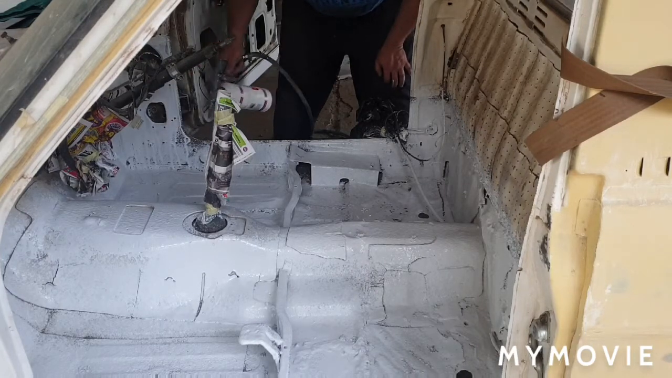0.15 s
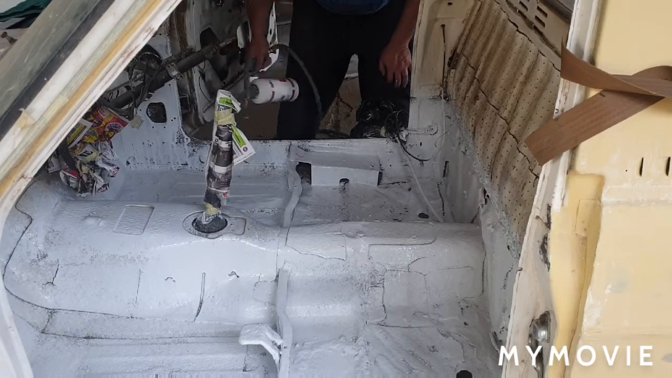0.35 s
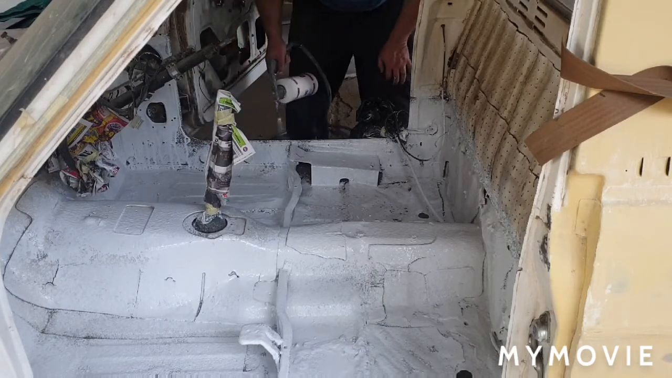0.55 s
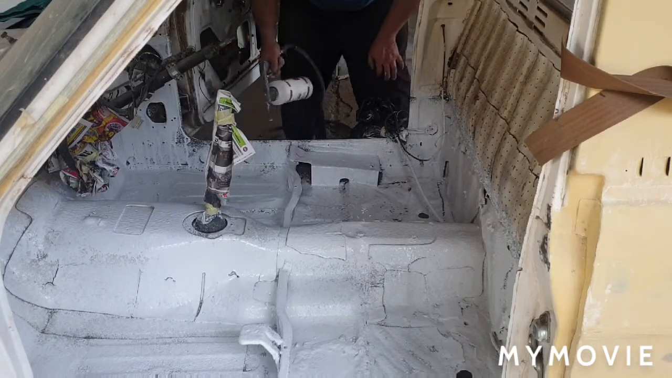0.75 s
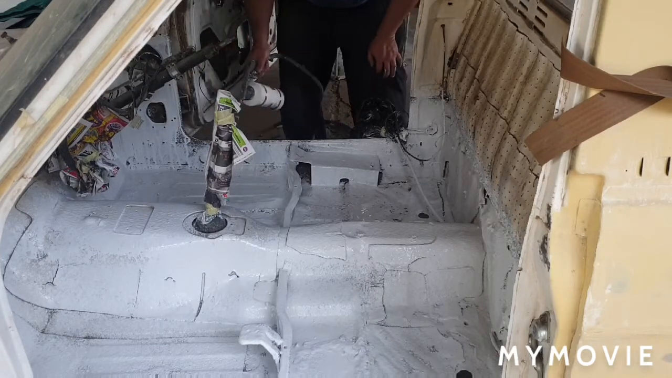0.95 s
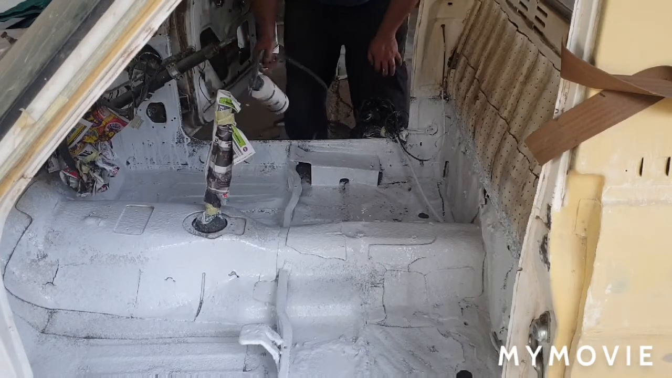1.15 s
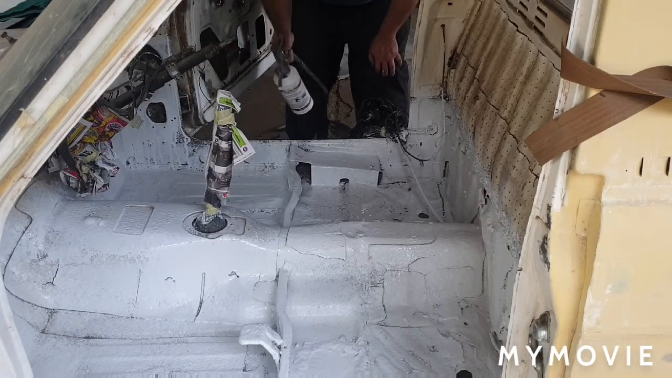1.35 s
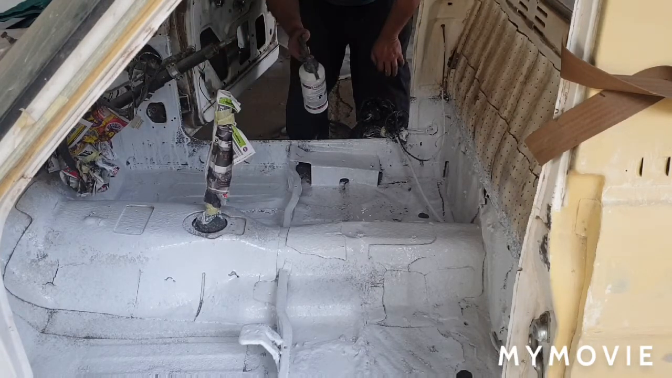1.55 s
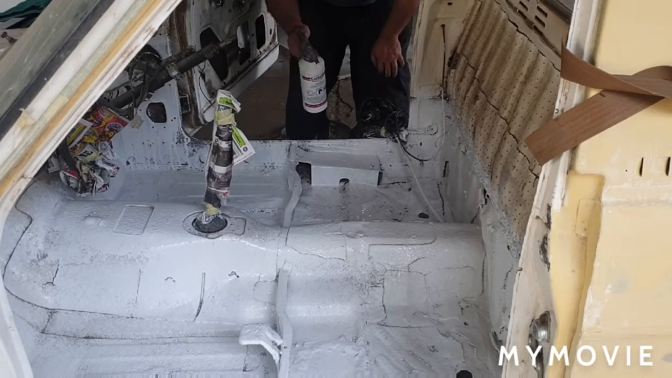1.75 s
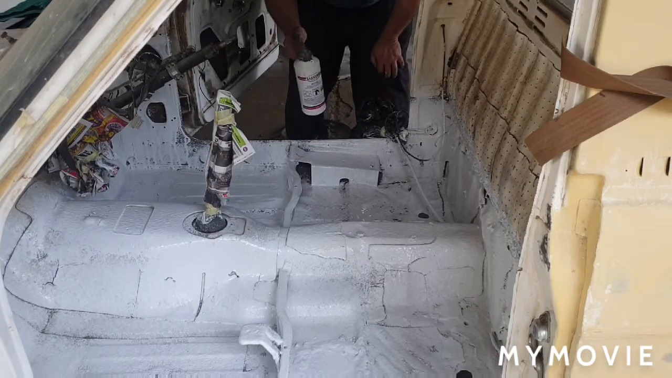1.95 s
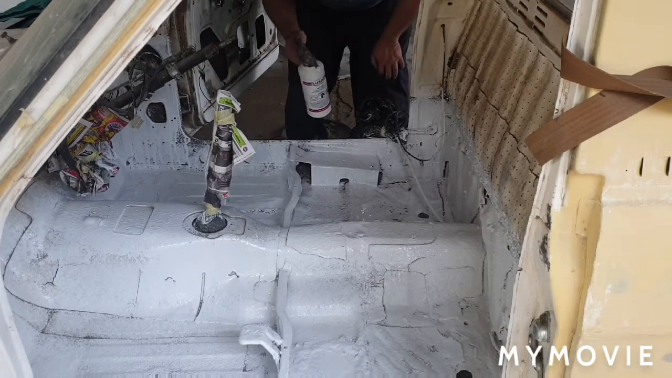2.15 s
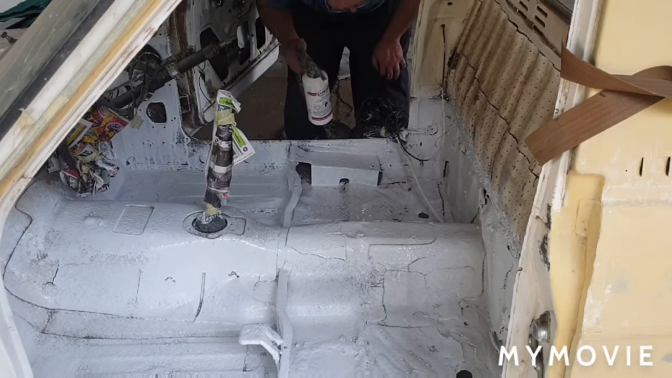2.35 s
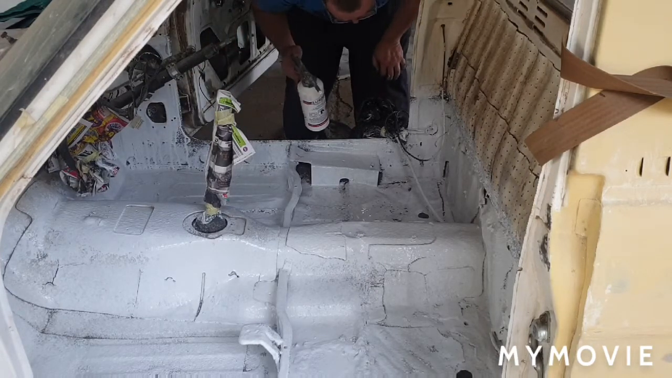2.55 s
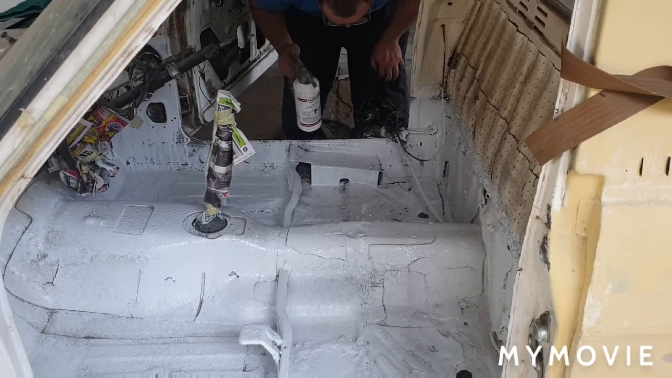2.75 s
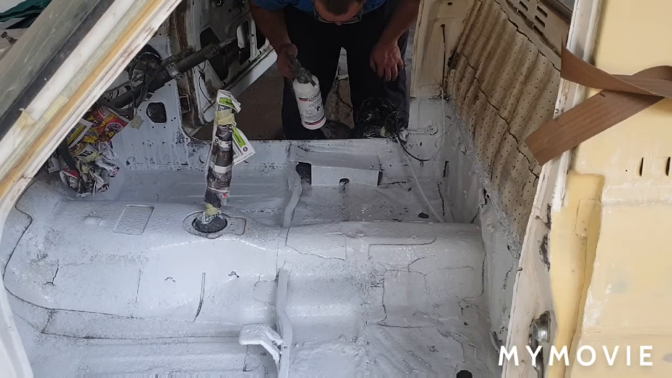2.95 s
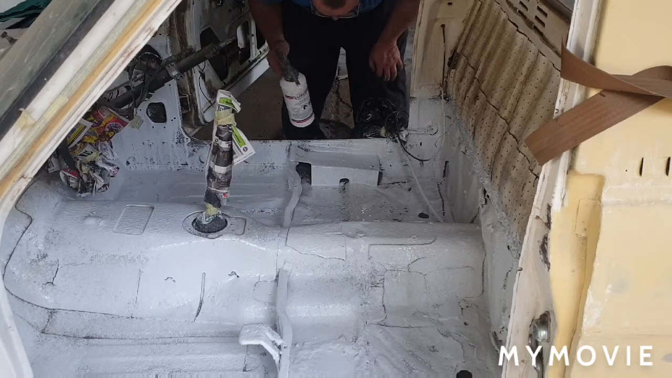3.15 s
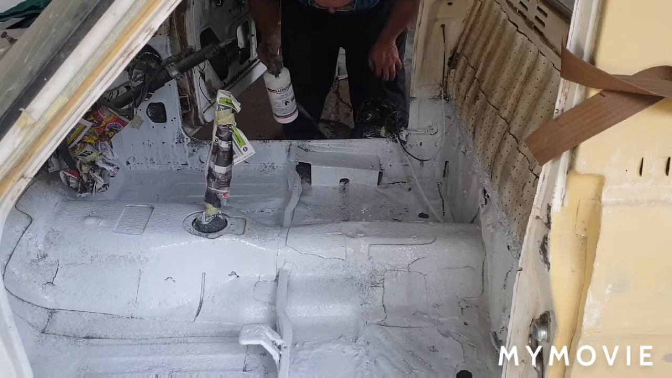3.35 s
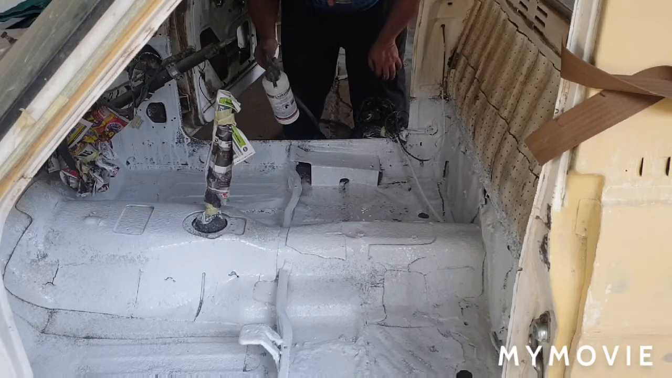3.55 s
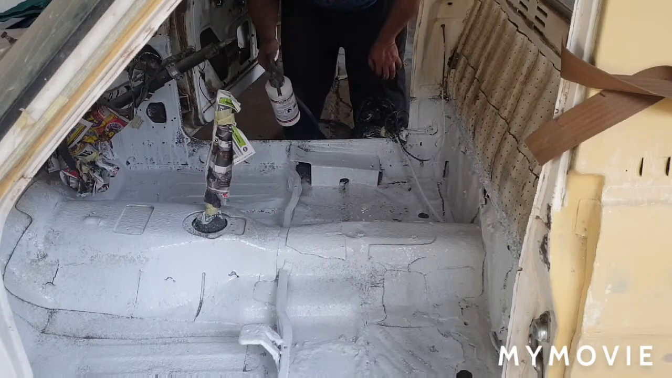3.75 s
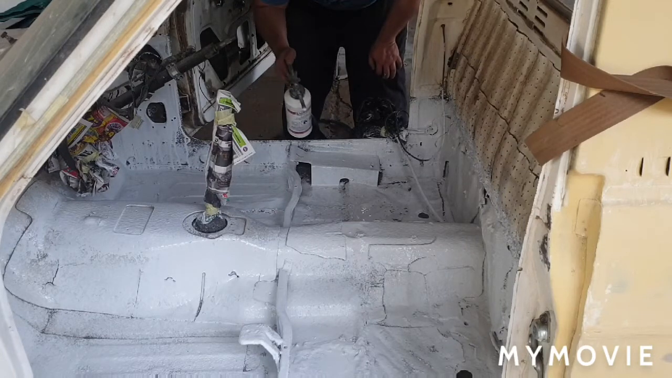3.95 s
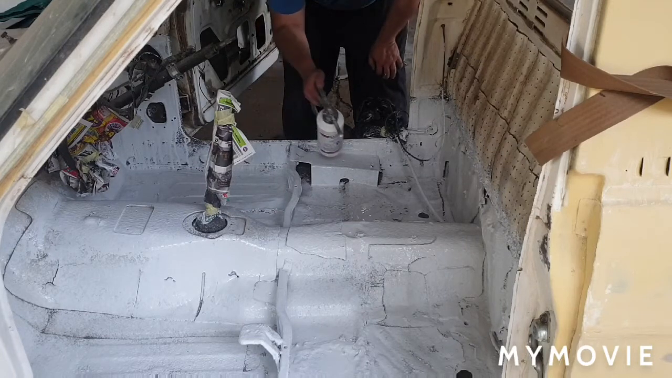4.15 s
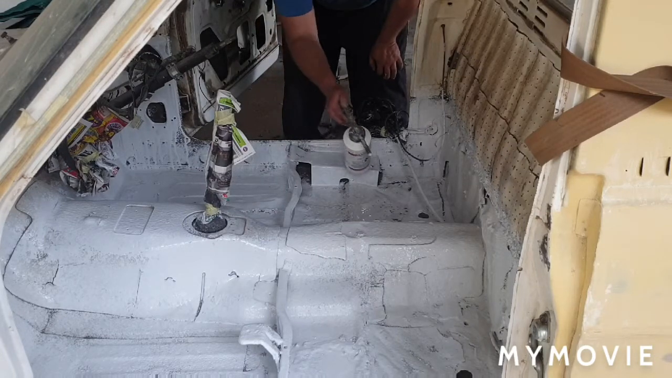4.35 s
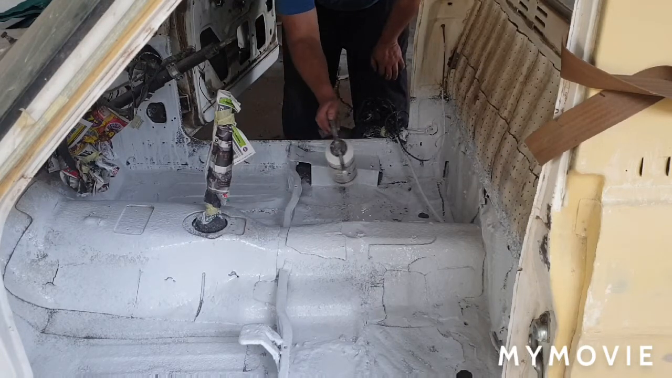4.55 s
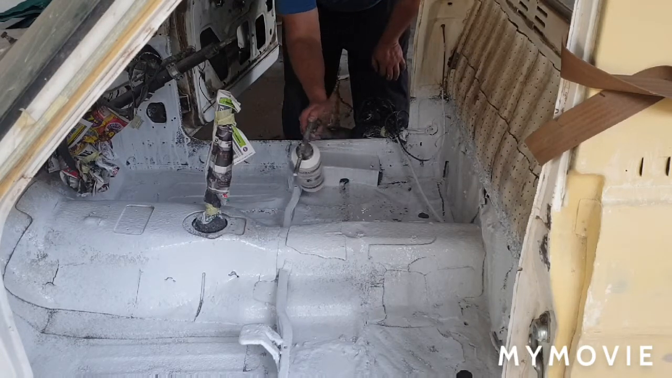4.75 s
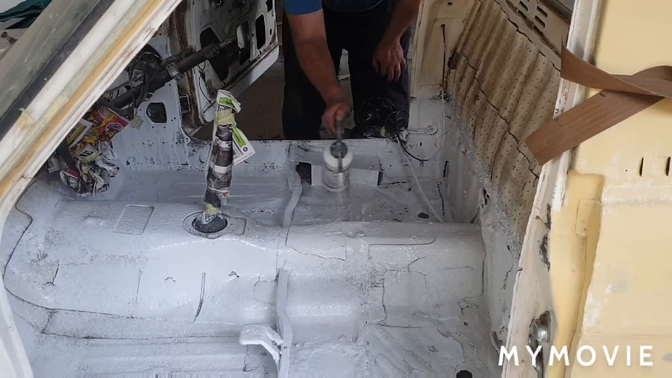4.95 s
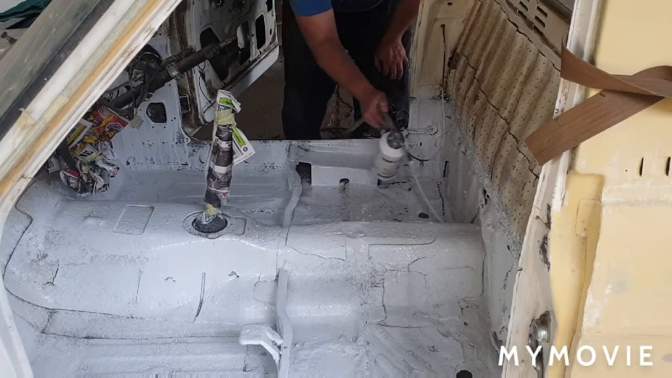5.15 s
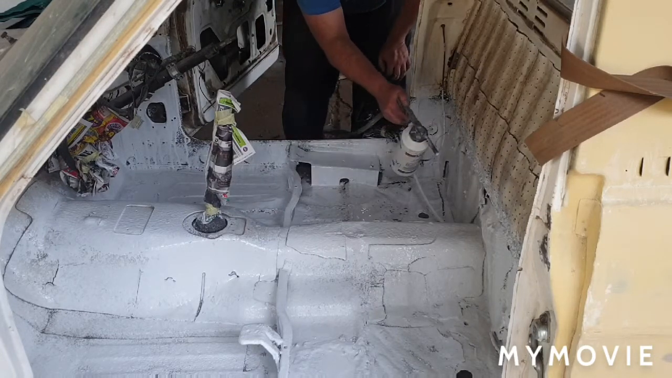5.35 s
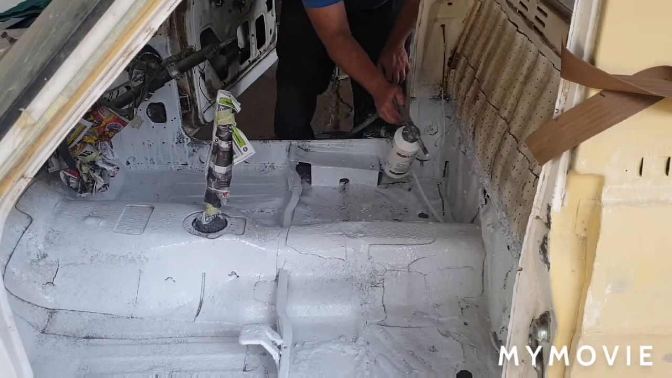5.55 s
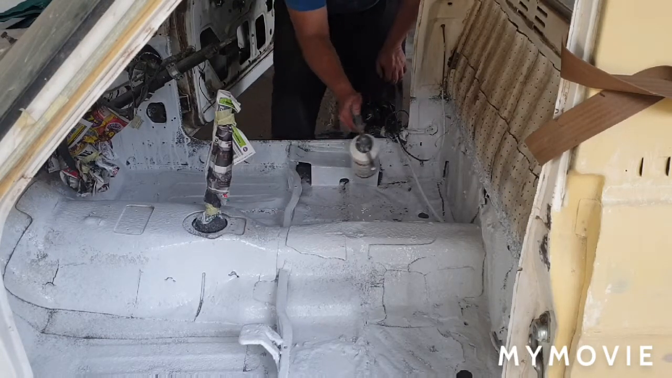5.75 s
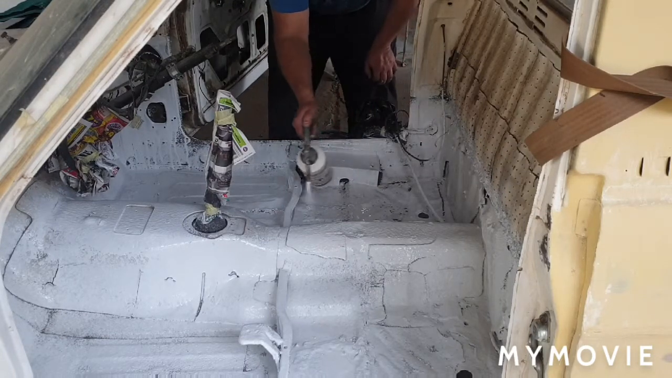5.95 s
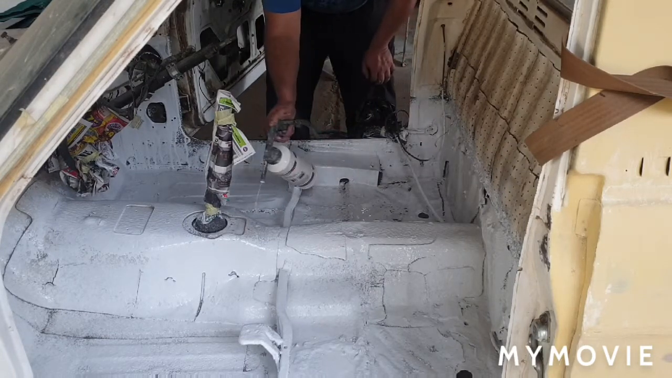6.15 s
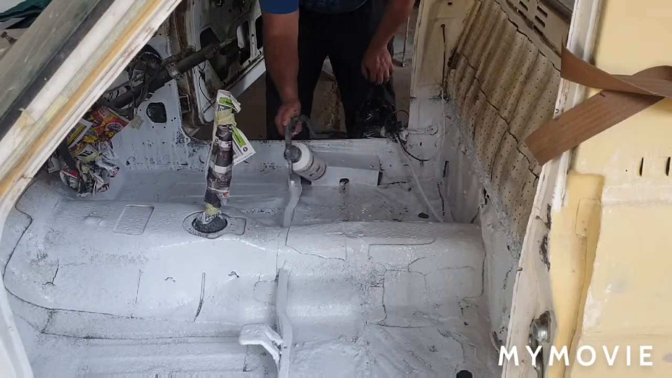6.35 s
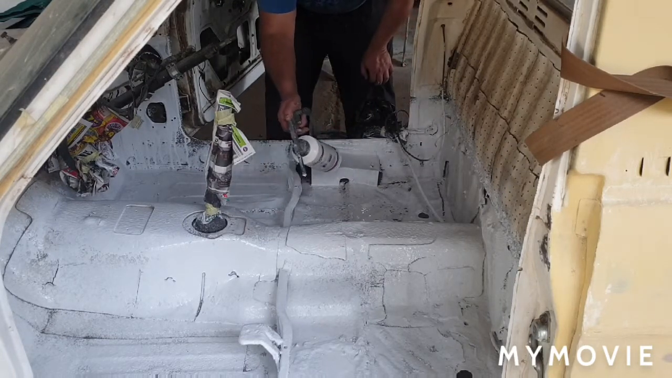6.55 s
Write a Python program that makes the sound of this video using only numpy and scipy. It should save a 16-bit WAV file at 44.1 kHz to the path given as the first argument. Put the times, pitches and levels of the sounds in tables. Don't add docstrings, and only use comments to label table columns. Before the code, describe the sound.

A piston compressor beats quickly and hums in the workshop behind, with faint air hiss and an unsteady low engine idle outside, strongest at the start and around 3.6-4.6 s. Dull hose knocks come at 0.25 and 0.37 s. A spray gun at arm's length gives soft, bright hisses at 0.5 and 0.9 s, each under 0.2 s, ringing briefly in the bare steel van. From 1.1 to 4.3 s there is no spray: tiny fitting clinks, knocks, dry ticks and light rustling, while the camera microphone's gain slowly lifts the background. Very faint rising squeals pass near 4.5 s. At 4.6 s a hard, sputtering burst ducks the background; another follows at 5.03 s. Clinks at 5.4 s, a short gritty shoe scuff at 5.7 s. Medium bursts at 6.04 and 6.38 s, with a soft low floor-pan thump and dry tick around 6.2 s between them.

```python
import sys
import numpy as np
from scipy import signal
from scipy.fft import rfft, irfft, next_fast_len
from scipy.io import wavfile
from scipy.ndimage import uniform_filter1d, map_coordinates

SR = 44100
rng = np.random.default_rng(int(sys.argv[2]) if len(sys.argv) > 2 else 0)


def decibels_to_gain(level_db):
    exponent = np.asarray(level_db, float) / 20
    return 10 ** exponent


def transcribe(u):
    v = np.clip(np.atleast_2d(u).T, -1, 1)
    q = np.round(v * 32767).astype(np.int16)
    wavfile.write(sys.argv[1], SR, q)


N = 291501

# valve opens [s], rise [s], nozzle hiss [dB], sag of the hiss [dB per s],
# lift of its thin top [dB].
TRIGGER_PULLS = [
    (0.514, 0.019, -25.5, 8, 2.5),
    (.878, 0.018, -27, -4, 5),
    (4.625, 0.0056, -18, 31, -0.5),
    (5.033, 0.014, -21, 20, -0.5),
    (6.043, 0.012, -25, 12, 2.5),
    (6.378, 0.018, -24, 22, 2),
]
# time [s], jet
# level [dB].
WRIST_SWEEPS = [
    [(.535, -33.5), (.552, -29.5), (.661, -35), (.69, -34)],
    [(.895, -33), (.973, -30), (1.005, -35.5), (1.055, -30.5)],
    [(4.64, -27.5), (4.666, -21), (4.692, -29.5), (4.722, -27), (4.76, -27.5), (4.815, -28.5)],
    [(5.05, -24), (5.08, -28.5), (5.198, -23), (5.224, -35), (5.24, -28)],
    [(6.06, -27.5), (6.094, -31), (6.156, -27.5), (6.178, -35.5), (6.205, -32)],
    [(6.395, -28), (6.489, -26.5), (6.53, -28.5)],
]
# frequency [Hz], density [dB per Hz].
JET_SPECTRUM = [(330, -22.5), (520, -22), (1400, -13), (2400, -13), (3300, -6), (4100, -7.5), (5000, -4.5),
                (6800, -3), (7600, -9.5), (9700, -10), (11000, -3.5), (13000, -8.5), (14200, -5),
                (15700, -7.5)]
# frequency [Hz], t60 [s].
VAN_RING = [(500, 0.24), (2000, 0.5), (6000, 0.32), (15000, 0.24)]
# start [s], level [dB], brightness [dB per octave].
CLINKS = [(1.213, -60, 3), (1.397, -57, 1), (1.426, -58, 0), (1.489, -57, 0), (1.519, -60, 4),
          (1.656, -59, 0), (1.912, -57, 3), (2.435, -58, -9), (3.175, -56, 5), (3.255, -57, -4),
          (3.283, -54, 1), (3.612, -52, 1), (3.67, -57, -1), (3.703, -55, 3), (5.396, -57, 2)]
# frequency [Hz], level [dB], t60 [s].
FITTING_MODES = [(2655, -3.5, .55), (3520, -2, .16), (4030, -10, .1), (4447, -4, .15), (4640, -2, .14),
                 (4807, -10, .15), (5600, -15, .35), (5674, -18, .06), (6090, -12, .1), (6794, -8, .14),
                 (7090, -11, .12), (8400, -15, .08), (9800, -14, .08), (11160, -13, .08)]
# start [s], peak [dB].
REEL_KNOCKS = [(0.2523, -46), (0.37, -37.5), (1.1029, -44), (1.1568, -42), (1.3997, -38), (1.4272, -36.5),
               (1.507, -40), (1.9131, -40.5), (2.4274, -43), (2.4538, -38), (3.1298, -40), (3.2846, -38),
               (3.3508, -37.5), (3.54, -46), (3.6019, -36), (3.6666, -37), (4.2266, -41), (4.2637, -43),
               (4.999, -41.5), (5.3248, -40.5), (5.3981, -38.5)]
# frequency [Hz], level [dB], t60 [s].
REEL_MODES = [(1800, -14, .12), (1950, 0, .1), (2008, -2, .08)]
# start [s], level [dB], pitch [Hz].
DRY_TICKS = [(2.128, -49.5, 2630), (2.27, -54, 5330), (2.67, -55, 5290), (2.84, -56, 5500),
             (2.954, -52, 4110), (6.21, -32.5, 1000), (2.992, -43.5, 2110), (3.54, -42, 1890),
             (.025, -51, 4040), (3.791, -48, 5700), (4.27, -47, 5900), (4.39, -44, 4200),
             (5.808, -58, 6300), (5.98, -58, 6270)]
# start [s], length [s], level [dB], starting pitch [Hz].
FAR_SQUEALS = [
    (4.48, .15, -62, 4020),
    (4.455, .07, -62, 4370),
]
# frequency [Hz], level [dB], t60 [s].
FLOOR_PAN = [(62, 2.5, 0.4), (91.4, 6, 0.31)]
# frequency [Hz], width [Hz], level [dB].
PUMP_CASING = [(619, 58, 7.5), (1525, 19, -4.5)]
# multiple of the crank rate, level [dB rms].
PUMP_ORDERS = [(8, -65), (9.5, -68), (15, -71), (16, -72), (17, -71), (18, -62), (19, -67), (23, -70)]
# frequency [Hz], level [dB rms].
MOTOR_HUM = [(50, -68), (200, -69), (866.5, -72), (883, -72), (949.7, -73), (1033, -77), (1050, -75),
             (1066.4, -63), (1133, -78)]
# time [s], level [dB], firing rate [Hz].
ENGINES_PASSING = [(0.0, -50, 64), (0.15, -45, 64), (0.31, -53, 66.2), (0.48, -44, 65.3), (0.77, -62, 67.1),
                   (0.94, -53, 67.6), (1.07, -70, 69.3), (1.18, -56, 70.9), (1.5, -56.5, 71.6),
                   (2.2, -66.5, 71), (3.05, -61, 65), (3.28, -67, 63), (3.42, -55, 63.8), (3.65, -45.5, 64),
                   (4.53, -48.5, 64), (4.82, -59, 62.7), (5.7, -59, 61.5), (6.61, -72, 55)]
# frequency [Hz], density [dB per Hz].
SHOP_AIR = [(25, -17), (60, -13), (140, -6), (230, -15.5), (350, -10.5), (470, -20), (620, -16.5),
            (800, -18), (2300, -26), (3000, -35.5), (5200, -32), (6600, -34.5), (8500, -42), (14500, -30.5)]


def unit(x):
    return x / np.sqrt(np.mean(x ** 2) + 1e-20)


def along(points, hz):
    f, v = np.transpose(points)
    return np.interp(np.log(hz + 1), np.log(f + 1), v)


def curves(rows):
    s, *cols = np.transpose(rows)
    return [np.interp(np.arange(N) / SR, s, c) for c in cols]


def wobble(rate):
    knots = rng.standard_normal(int(N * rate / SR) + 4)
    return map_coordinates(knots, [np.arange(N) * rate / SR])


def filtered(x, response):
    m = next_fast_len(N + SR // 2)
    return irfft(rfft(x, m) * response(np.fft.rfftfreq(m, 1 / SR)), m)[..., :N]


def resonances(modes):
    def response(f):
        return sum((-1) ** k * decibels_to_gain(db) * 1j * f * w / (c * c - f * f + 1j * f * w)
                   for k, (c, w, db) in enumerate(modes))
    return response


def band_noise(noise, hz, width):
    return unit(filtered(noise, lambda f: resonances([(hz, width, 0)])(f) ** 2))


def rush(spectrum, patchy_db):
    z = signal.stft(rng.standard_normal(N), nperseg=512)[2]
    field = uniform_filter1d(rng.standard_normal(z.shape), size=2, axis=0)
    field = uniform_filter1d(field, size=10, axis=1)
    x = signal.istft(z * decibels_to_gain(patchy_db * unit(field)), nperseg=512)[1][:N]
    return filtered(x, lambda hz: decibels_to_gain(along(spectrum, hz)))


def tail(stretch):
    hz, t, z = signal.stft(rng.standard_normal(SR // 2), SR, nperseg=256)
    t60 = stretch * along(VAN_RING, hz)[:, None]
    h = signal.istft(z * decibels_to_gain(-60 * t / t60), SR, nperseg=256)[1]
    return h / np.linalg.norm(h)


def spray():
    sweep_mid_db, splash_db, drum_db = -28.5, -41, -51
    splash_follows, drum_follows = 0.81, -0.11
    spit_peak_db, spit_s = 3, 0.011
    out, t = np.zeros(N), np.arange(N) / SR
    noise = rush(JET_SPECTRUM, patchy_db=3.0) * decibels_to_gain(0.53 * wobble(60) + 0.52 * wobble(500))
    under = [filtered(noise, lambda hz: 1 / (1 + (hz / edge) ** 12)) for edge in (950, 2700, 8500, 13000)]
    drum, splash, jet = unit(under[0]), unit(under[1] - under[0]), unit(under[2] - under[1])
    hiss = noise - under[2]
    thin_top = (noise - under[3]) / np.std(hiss)
    hiss = unit(hiss)
    for rows, (opens, rise, hiss_db, sag_db, top_db) in zip(WRIST_SWEEPS, TRIGGER_PULLS):
        aim_db, shuts = curves(rows)[0] - sweep_mid_db, rows[-1][0]
        spit_db = spit_peak_db * np.exp(-((t - shuts) / spit_s) ** 2)
        valve = np.clip((t - opens) / rise, 0, 1) ** 0.85
        valve *= decibels_to_gain(-450 * np.clip(t - shuts, 0, 1))
        mix = decibels_to_gain(sweep_mid_db + aim_db) * jet
        mix += decibels_to_gain(hiss_db - sag_db * np.clip(t - opens, 0, 1)) * (hiss + (decibels_to_gain(top_db) - 1) * thin_top)
        mix += decibels_to_gain(splash_db + splash_follows * aim_db + spit_db) * splash
        mix += decibels_to_gain(drum_db + drum_follows * aim_db + spit_db) * drum
        now = slice(round(opens * SR), round((shuts + .5) * SR))
        direct = (valve * decibels_to_gain(-1.0) * mix)[now]
        van = np.pad(tail(0.85), (130, 0))
        out[now] += direct + decibels_to_gain(-7) * signal.fftconvolve(direct, van)[:len(direct)]
    return out


def rings(hits, modes):
    out, t = np.zeros(N + SR), np.arange(SR // 2) / SR
    crack_band = signal.butter(2, [2300, 7200], 'band', fs=SR)
    chance = rng.standard_normal((len(hits), len(modes)))
    for (s, db, tilt_db), luck in zip(hits, chance):
        ring = 0
        for (hz, level, t60), e in zip(modes, luck):
            mode_db = level + tilt_db * np.log2(hz / 2700) + 1.5 * e
            ring = ring + decibels_to_gain(mode_db - 60 * t / t60) * np.sin(2 * np.pi * hz * t + 9 * e)
        crack = signal.lfilter(*crack_band, rng.standard_normal(len(t)))
        crack *= decibels_to_gain(-2 + tilt_db - 60 * t / .16)
        out[round(s * SR):][:len(t)] += decibels_to_gain(db) * (ring + crack) * (1 - np.exp(-t / .0025))
    return out


def ticks():
    out, t = np.zeros(N + SR), np.arange(SR // 2) / SR
    for s, db, hz in DRY_TICKS:
        band = signal.iirpeak(hz, 4, SR)
        grit = decibels_to_gain(-60 * t / .045) * rng.standard_normal(len(t))
        grit = signal.lfilter(*band, signal.lfilter(*band, grit))
        out[round(s * SR):][:len(t)] += decibels_to_gain(db) * grit / np.abs(grit).max()
    return out


def squeals():
    out, rises_hz_per_s = np.zeros(N), 1900
    for s, lasts, db, hz in FAR_SQUEALS:
        since = np.arange(N) / SR - s
        swell = np.sin(np.pi * np.clip(since / lasts, 0, 1))
        out += decibels_to_gain(db) * swell * np.sin(2 * np.pi * since * (hz + rises_hz_per_s * since / 2))
    return out


def clinks():
    knocks = [(s, db - 8, -8) for s, db in REEL_KNOCKS]
    metal = rings(CLINKS, FITTING_MODES) + rings(knocks, REEL_MODES) + ticks()
    shaken = metal[:N] * decibels_to_gain(1.5 * wobble(90)) + decibels_to_gain(1.5 * wobble(40)) * squeals()
    return shaken + decibels_to_gain(-6) * signal.fftconvolve(shaken, tail(1.1))[:N]


def scuff():
    start_s, level_db, rise_s, hold_s, fades_db_per_s = 5.687, -46.5, 0.011, 0.067, 260
    start_hz, end_hz, slows_s = 2480, 450, 0.019
    t = np.clip(np.arange(N) / SR - start_s, 0, None)
    drag = np.clip(t / rise_s, 0, 1) * decibels_to_gain(level_db - fades_db_per_s * np.clip(t - hold_s, 0, 1))
    centre = end_hz + (start_hz - end_hz) * np.exp(-t / slows_s)
    share = np.clip(np.log(centre / 500) / np.log(5), 0, 1)
    grit = rng.standard_normal((2, N)) * decibels_to_gain(1.0 * wobble(180))
    dull, bright = band_noise(grit[0], 690, 840), band_noise(grit[1], 1480, 1600)
    return drag * ((1 - share) * dull + share * bright)


def bump():
    start_s, level_db, rise_s = 6.17, -41.5, 0.025
    t = np.clip(np.arange(N) / SR - start_s, 0, None)
    ring = sum(decibels_to_gain(db - 60 * t / t60) * np.sin(2 * np.pi * hz * t) for hz, db, t60 in FLOOR_PAN)
    return decibels_to_gain(level_db) * ring * (1 - np.exp(-t / rise_s)) ** 2


def rustle():
    flecks, level_db, spread_db, low_hz, high_hz, t60 = 70, -66, 3, 4000, 7000, .03
    out, t = np.zeros(N + SR), np.arange(SR // 20) / SR
    for when, pitch, size in rng.random((flecks, 3)):
        hz = low_hz * (high_hz / low_hz) ** pitch
        fleck = decibels_to_gain(level_db - spread_db * np.log(size) - 60 * t / t60) * (1 - np.exp(-t / .002))
        rough = 1 + rng.standard_normal(len(t)) / 2
        out[int(when * N):][:len(t)] += fleck * np.sin(2 * np.pi * hz * t) * rough
    return out[:N]


def compressor():
    crank_hz, first_stroke_s = 16.76, .013
    t, turns = np.arange(N) / SR, np.arange(int(N / SR * crank_hz))
    strokes = np.zeros(N)
    stroke_db = 0.25 * (-1.) ** turns + rng.normal(0, 0.53, len(turns))
    strokes[((first_stroke_s + turns / crank_hz) * SR).astype(int)] = decibels_to_gain(stroke_db)
    knock = signal.fftconvolve(strokes, tail(1.0))[:N]
    casing = decibels_to_gain(-64) * unit(filtered(knock, resonances(PUMP_CASING)))
    ping = np.arange(1800) * decibels_to_gain(-np.arange(1800) / 28)
    seat = signal.fftconvolve(strokes, ping)[:N]
    plate = np.sin(2 * np.pi * (1980 * t + np.cumsum(30 * wobble(60)) / SR))
    valve = decibels_to_gain(-68) * unit(seat * plate)
    valve += decibels_to_gain(-70.5) * band_noise(rng.standard_normal(N), 1975, 130)
    intake = decibels_to_gain(-71.0) * band_noise(rng.standard_normal(N), 3950, 900)
    crank = 2 * np.pi * crank_hz * t
    uneven = .75 * np.sin(crank / 2) + .75 * np.sin(crank)
    fan = decibels_to_gain(-54) * np.sin(21 * crank + uneven)
    lines = MOTOR_HUM + [(order * crank_hz, db) for order, db in PUMP_ORDERS]
    hum = sum(decibels_to_gain(db + 3 + 1.2 * wobble(4)) * np.sin(2 * np.pi * (hz * t + rng.random())) for hz, db in lines)
    return casing + valve + intake + decibels_to_gain(-2.0) * fan + decibels_to_gain(-4.0) * hum


def engine():
    db, hz = curves(ENGINES_PASSING)
    phase = 2 * np.pi * np.cumsum(hz) / SR + 0.39 * wobble(7.4)
    tone = np.sqrt(2) * np.sin(phase) + decibels_to_gain(-19.5) * np.sin(2 * phase)
    rumble = band_noise(rng.standard_normal(N), 66, 35)
    return decibels_to_gain(db - 1.5) * (decibels_to_gain(1.5 * wobble(20)) * tone + decibels_to_gain(-10) * rumble)


def workshop_air():
    return decibels_to_gain(-55.5 + 0.66 * wobble(4.1)) * unit(rush(SHOP_AIR, patchy_db=1.5))


def camera_gain():
    creep_from_s, creep_s, creep_db, duck_s, rest_db, after_db = 2.67, 1.72, 8, 0.082, 1, 0
    t = np.arange(N) / SR
    risen = np.sin(np.pi / 2 * np.clip((t - creep_from_s) / creep_s, 0, 1)) ** 2
    creep = rest_db + creep_db * risen
    return after_db + (creep - after_db) * np.exp(-np.clip(t - TRIGGER_PULLS[2][0], 0, None) / duck_s)


def scene():
    close = spray() + clinks() + scuff() + bump()
    riding = decibels_to_gain(camera_gain()) * (rustle() + compressor() + workshop_air())
    return (close + riding + engine())[None]


def roll_off(x):
    return signal.sosfilt(signal.butter(12, 16970, fs=SR, output="sos"), x)


def record(dry):
    top_hz = 15780
    mix = filtered(dry, lambda hz: .5 - .5 * np.tanh((hz - top_hz) / 14))
    return roll_off(mix)


dry = scene()
out = record(dry)
transcribe(out)
```